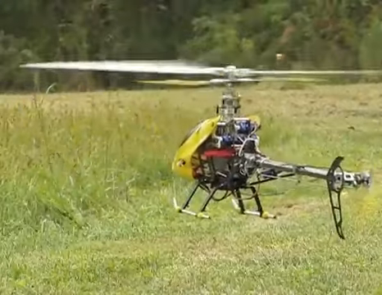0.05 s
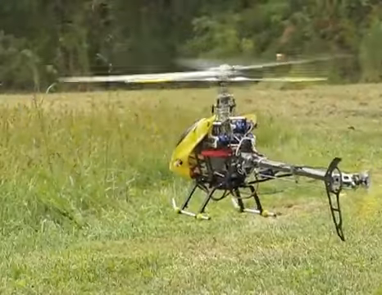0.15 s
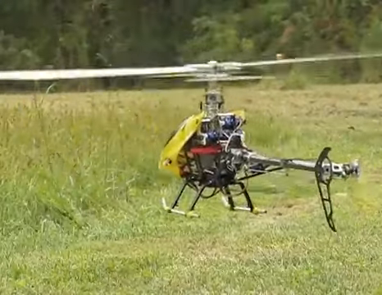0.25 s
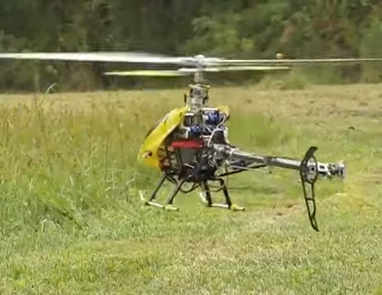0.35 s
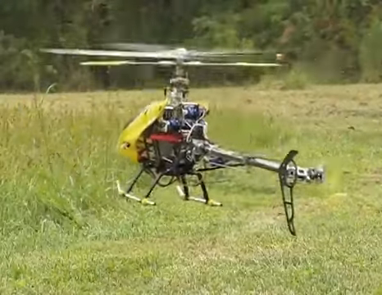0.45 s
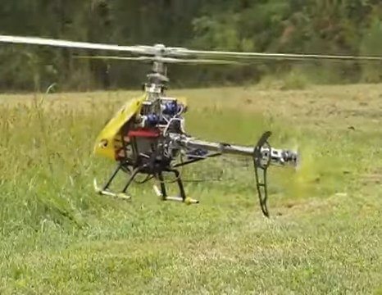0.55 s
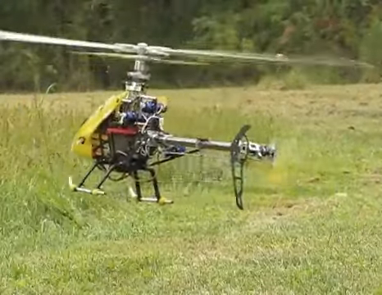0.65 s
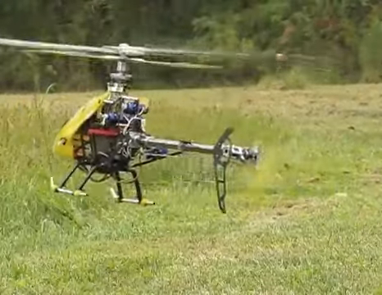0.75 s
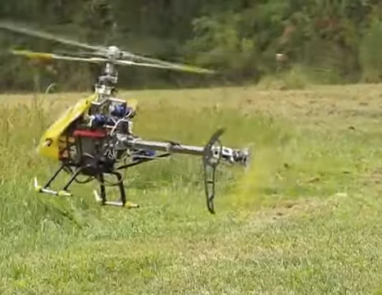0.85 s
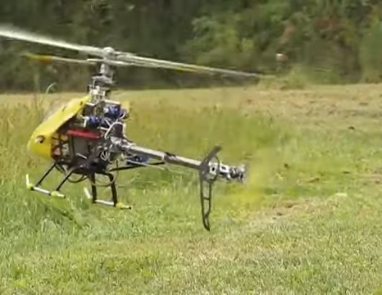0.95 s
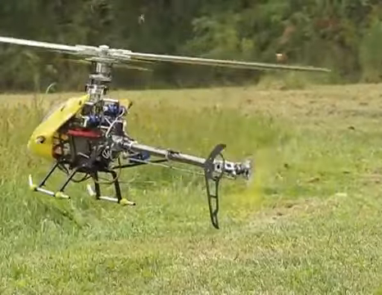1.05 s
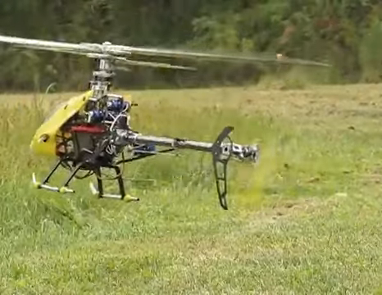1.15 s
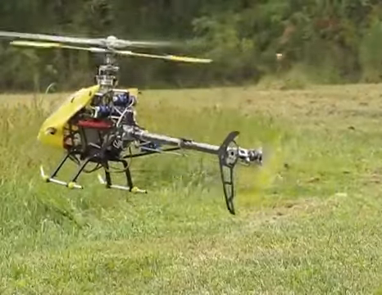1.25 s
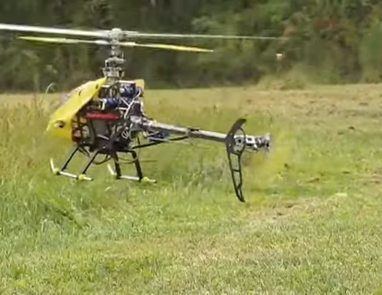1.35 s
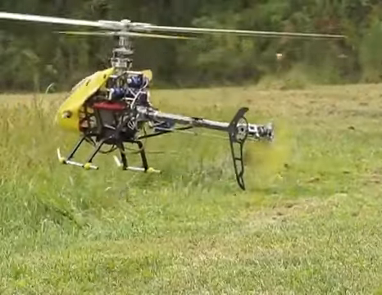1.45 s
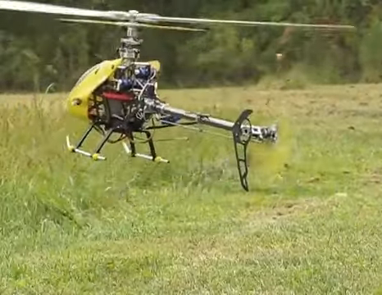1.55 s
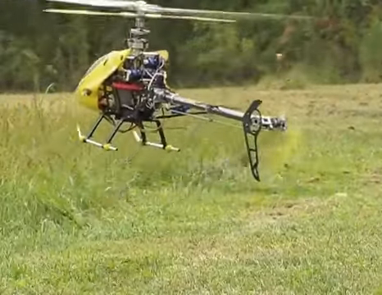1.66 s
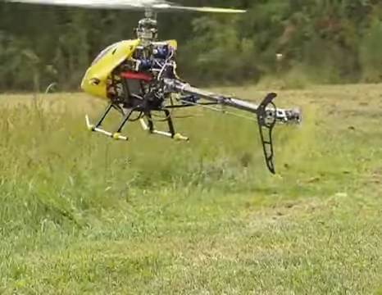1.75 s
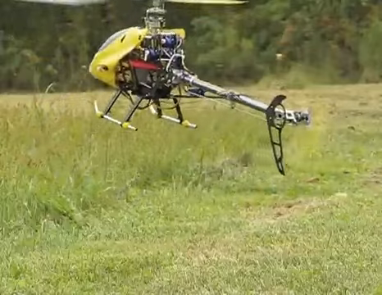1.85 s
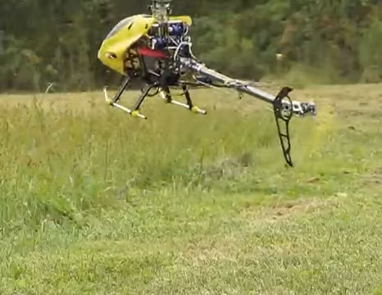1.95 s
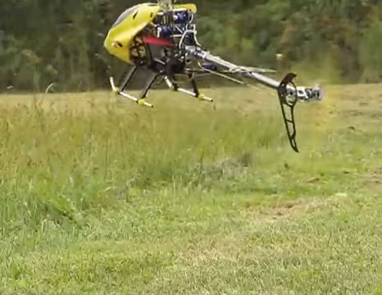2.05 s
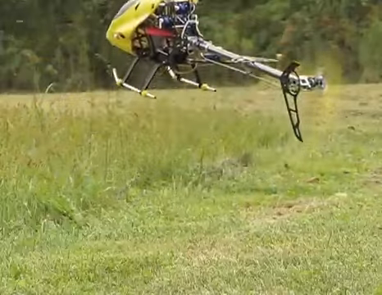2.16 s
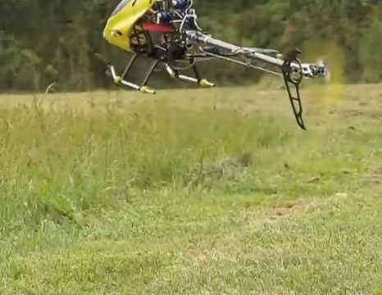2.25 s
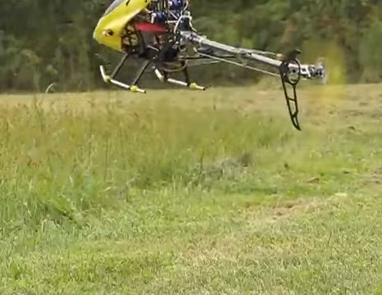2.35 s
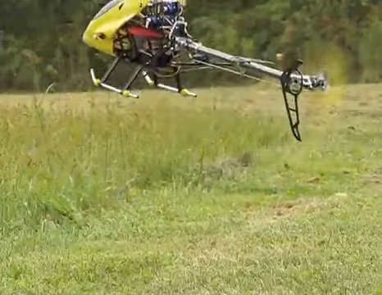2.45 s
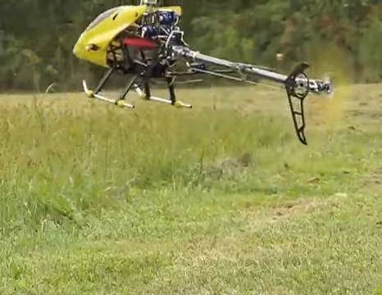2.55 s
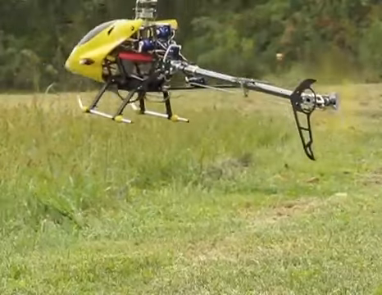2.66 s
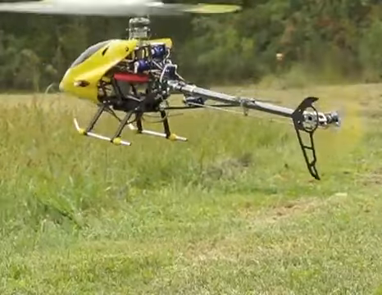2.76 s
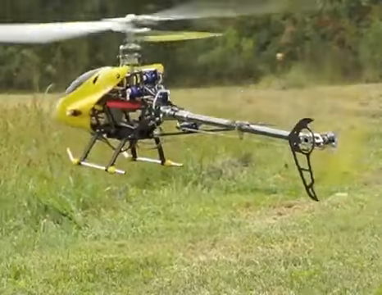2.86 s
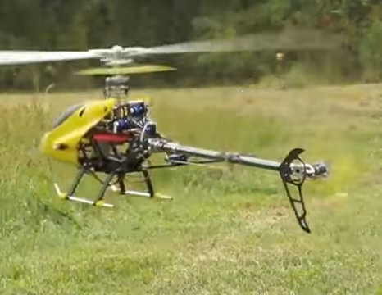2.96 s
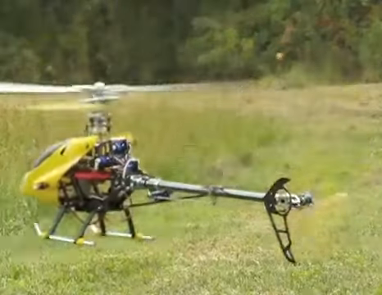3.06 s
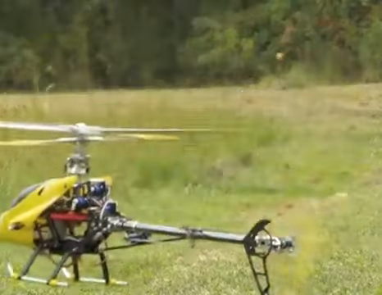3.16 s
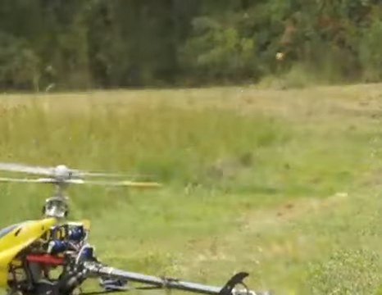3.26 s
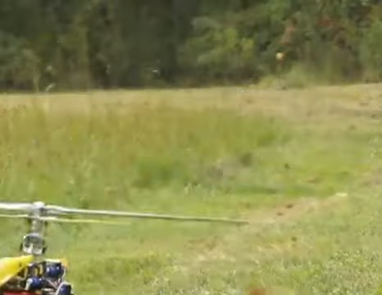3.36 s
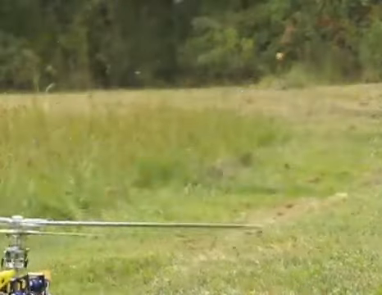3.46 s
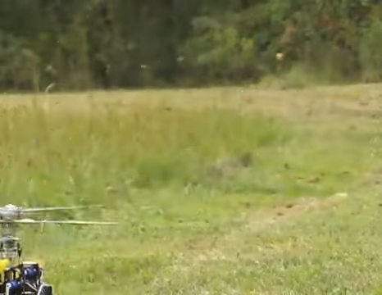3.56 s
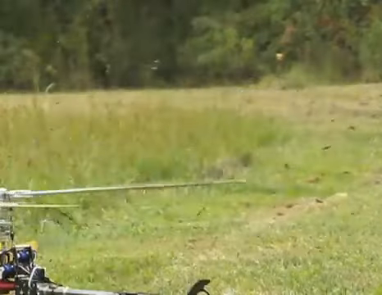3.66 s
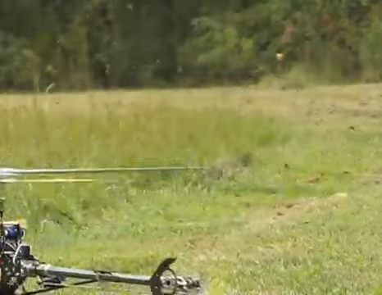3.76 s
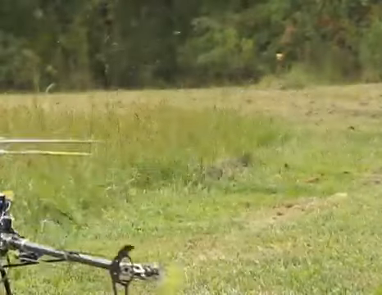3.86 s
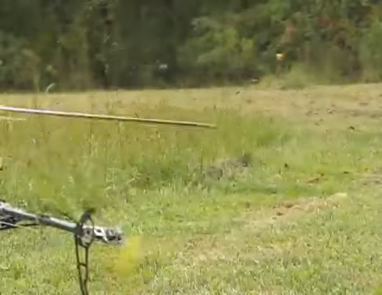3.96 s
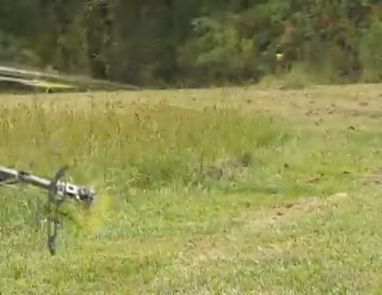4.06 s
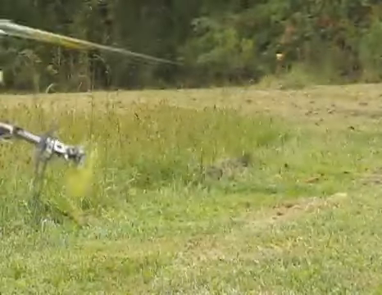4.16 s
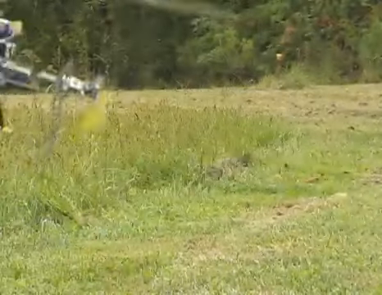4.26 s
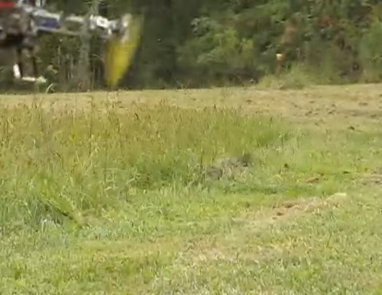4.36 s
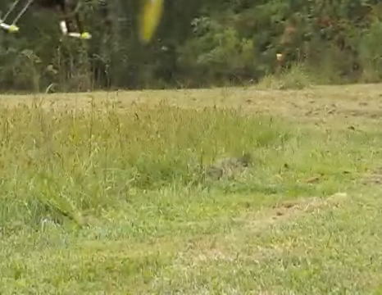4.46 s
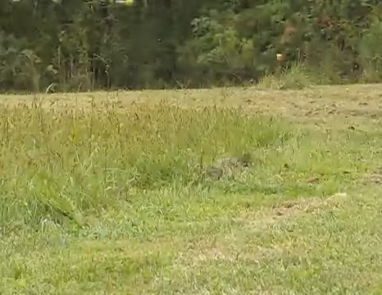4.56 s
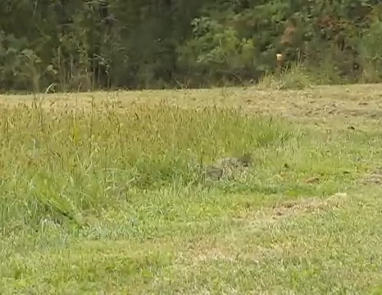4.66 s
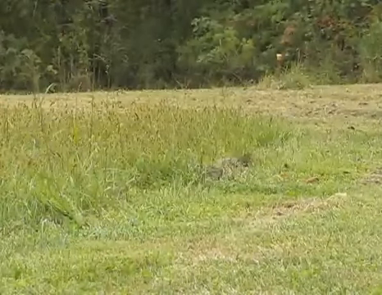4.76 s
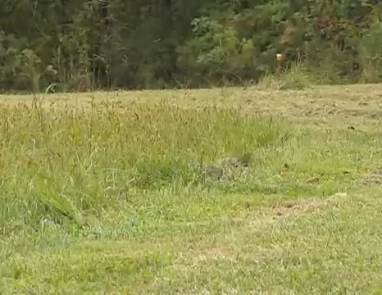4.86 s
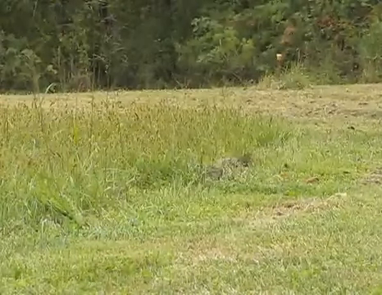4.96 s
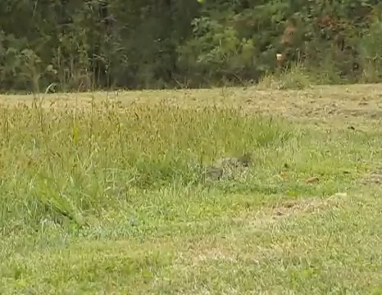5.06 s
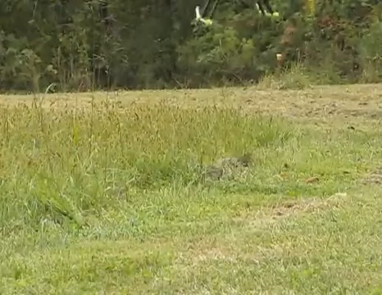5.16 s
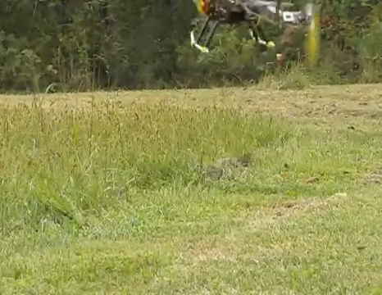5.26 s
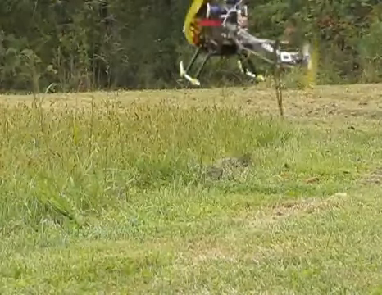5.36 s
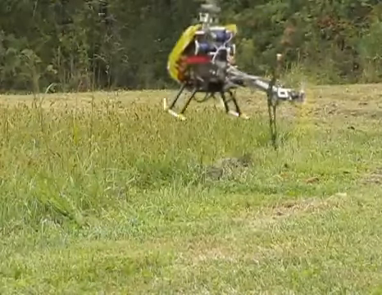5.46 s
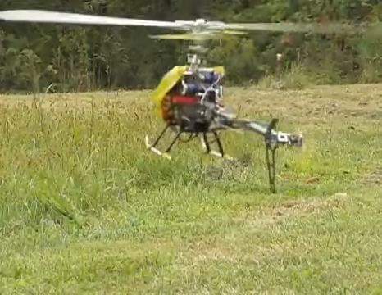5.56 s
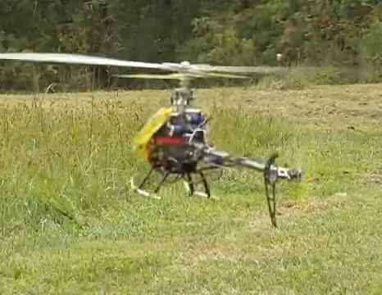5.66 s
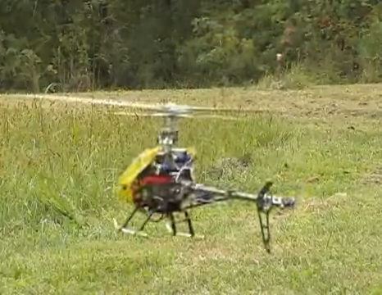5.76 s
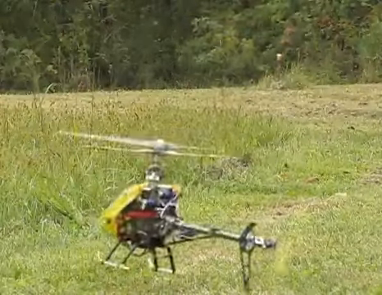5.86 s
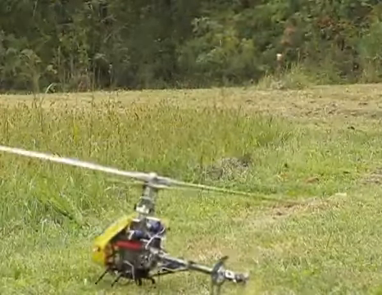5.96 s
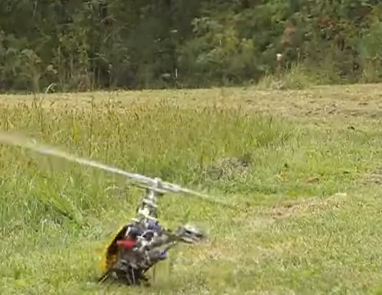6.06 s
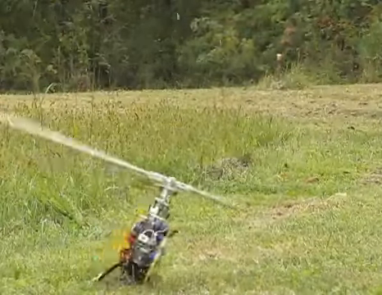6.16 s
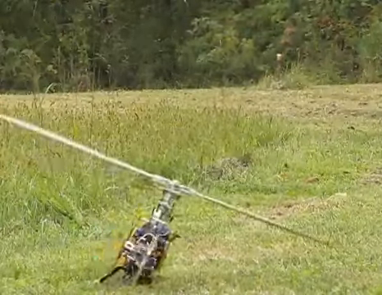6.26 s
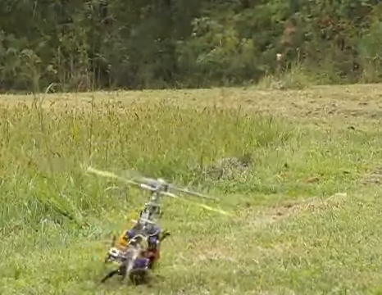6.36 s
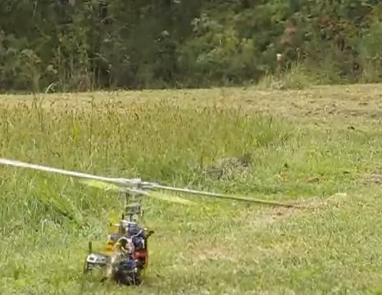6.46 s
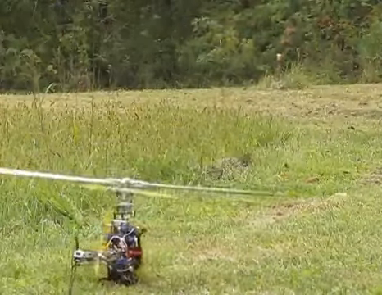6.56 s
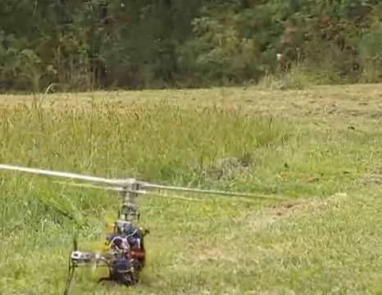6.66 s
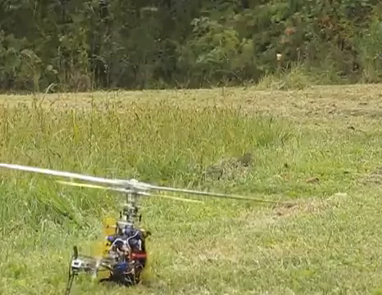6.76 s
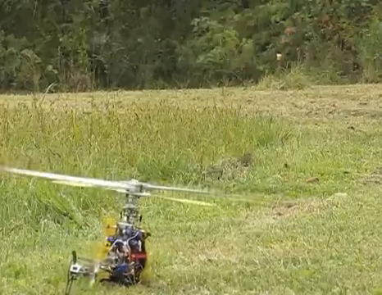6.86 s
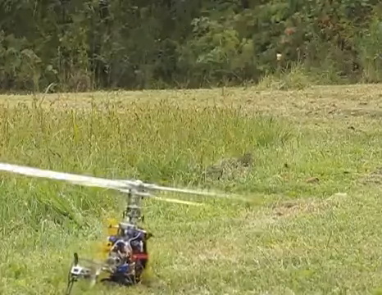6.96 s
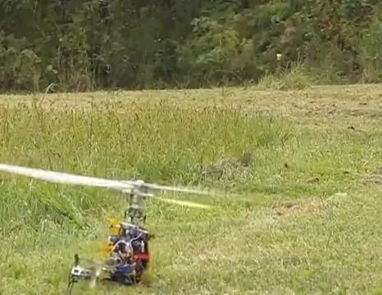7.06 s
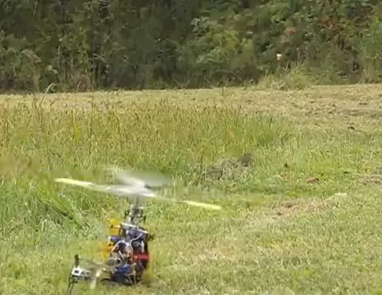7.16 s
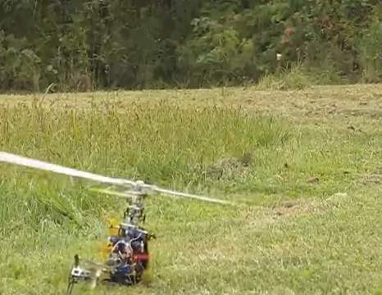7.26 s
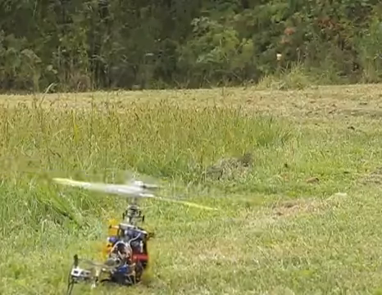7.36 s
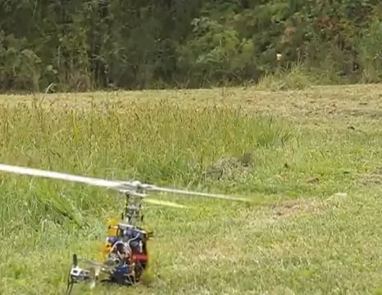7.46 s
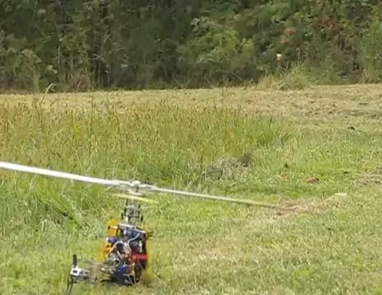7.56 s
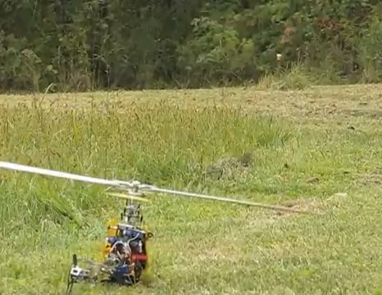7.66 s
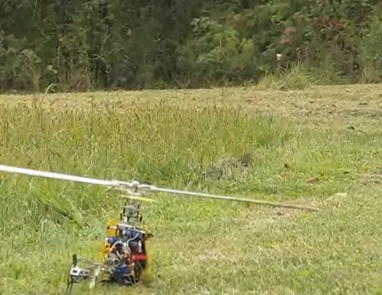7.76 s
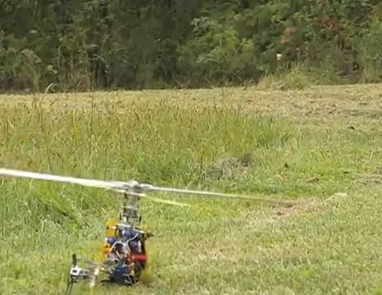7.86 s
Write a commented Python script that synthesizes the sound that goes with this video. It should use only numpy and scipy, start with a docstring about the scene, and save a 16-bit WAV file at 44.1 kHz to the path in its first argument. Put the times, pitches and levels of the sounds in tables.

```python
"""The whine and throb of an electric model helicopter hovering over a meadow, with one sharp early snap.
Its motor sings in harmonics, the off-centre main gear modulates the mesh tone once a rotor turn, and
the blades hum and swish. Interference with the echo off the grass hollows the sound as it climbs and
sinks. It lands and is switched off; the linkage ticks as the rotor coasts down, and crickets and
katydids come through."""
import sys
import numpy as np
from scipy import signal
from scipy.fft import rfft, irfft
from scipy.io import wavfile
from scipy.ndimage import uniform_filter1d

SR = 44100
rng = np.random.default_rng(int(sys.argv[2]) if len(sys.argv) > 2 else 0)


def put_to_file(sound):
    """Save the sound as 16-bit audio at rate SR, in the file named by the first command-line argument."""
    columns = np.atleast_2d(sound).T  # one column per channel
    safe = np.clip(columns, -1, 1)
    whole_steps = np.round(safe * 32767)
    wavfile.write(sys.argv[1], SR, whole_steps.astype(np.int16))


N = 348831
T = np.arange(N) / SR
HZ = np.fft.rfftfreq(N, 1 / SR)
PINION_TEETH, GEAR_TEETH, TAIL_RATIO = 10, 150, 3.625
POWER_OFF_S = 6.3


def amp(db):
    """Decibels to amplitude ratio."""
    return 10 ** (np.asarray(db) / 20)


def unit_rms(x):
    """Normalisation to an rms of one."""
    return x / np.sqrt(np.mean(x ** 2) + 1e-20)


def curves(rows):
    """Linear interpolation of each column over time."""
    times, *columns = np.transpose(rows)
    return [np.interp(T, times, column) for column in columns]


def spectrum(points):
    """Linear interpolation over log frequency."""
    hz, value = np.transpose(points)
    return np.interp(np.log(HZ + 1), np.log(hz + 1), value)


def colour(x, points):
    """Spectral shaping, normalised to an rms of one."""
    return unit_rms(irfft(rfft(x) * amp(spectrum(points)), N))


def drift(rate_hz):
    """Random modulation: low-pass noise of rms one."""
    return unit_rms(irfft(rfft(rng.standard_normal(N)) / (1 + (HZ / rate_hz) ** 4), N))


def stereo_noise(spread):
    """Partly coherent white noise: the channels are alike at spread 0, independent at 1."""
    mid, side = rng.standard_normal((2, N))
    return np.array([mid + spread * side, mid - spread * side])


def gritty(spread, grain_db=2.8):
    """Heavy-tailed noise: a few grains are louder than the rest."""
    return stereo_noise(spread) * amp(grain_db * np.minimum(rng.exponential(1, N), 4.2))


def add(mix, start_s, sound):
    """Superposition of a sound at a given time."""
    part = mix[round(start_s * SR):][:len(sound)]
    part += sound[:len(part)]


def tone(turns, flutter_db, scatter_rad):
    """Scintillation: turbulent air modulates the level and phase of a partial."""
    return unit_rms(amp(flutter_db * drift(22.0)) * np.cos(2 * np.pi * turns + scatter_rad * drift(44)))


def wandering(x, depth_db, bins=4):
    """Frequency-selective fading: patches of the spectrum slowly swell and sink."""
    frames = signal.stft(x, nperseg=1024, noverlap=768)[2]
    field = rng.standard_normal(frames.shape[1:])
    for size in (bins, 2 * bins):
        field = uniform_filter1d(uniform_filter1d(field, size, axis=0), size=8 * size, axis=1)
    return signal.istft(frames * amp(depth_db * unit_rms(field)), nperseg=1024, noverlap=768)[1][:, :N]


# Background spectra: (frequency [Hz], relative density [dB])
KATYDID_SPECTRUM = [(6000, -38.5), (6900, -9), (7300, 0.5), (7650, 3.5), (8100, -4.5), (9000, -9.5),
                    (10500, -38), (13000, -34)]
BREEZE_SPECTRUM = [(20, 15), (40, -3), (80, -7), (160, -33), (400, -30), (1000, -60)]
OPEN_AIR_SPECTRUM = [(20, -5), (70, 5), (170, -0.5), (300, -5.5), (600, -9), (1500, -16), (2100, -28),
                     (2400, -6.5), (2700, -22), (4000, -31), (9000, -14.5), (16000, -33.5)]


def meadow():
    """Incoherent sources add: fluttering katydids to the right, open air, a breeze on each microphone."""
    flutter_db = 0.27 * drift(40) + 1.0 * np.sin(2 * np.pi * 17 * T + 1.4 * drift(1.4))
    chorus = wandering(colour(stereo_noise(1.0), KATYDID_SPECTRUM), depth_db=2.9, bins=2)
    katydids = amp(flutter_db) * chorus * amp([[-.8], [.8]])
    breeze = colour(rng.standard_normal((2, N)), BREEZE_SPECTRUM)
    open_air = colour(stereo_noise(0.22), OPEN_AIR_SPECTRUM)
    return amp(-36) * katydids + amp(-47) * open_air + amp(-58) * breeze


# Chirps of three wing strokes: (time [s], level [dB])
CRICKET_CHIRPS = [(6.933, -40), (7.223, -38), (7.507, -45), (7.817, -38.5)]


def crickets(hz=4650, stroke_s=0.0436, length_s=0.033, sag=0.036, rasp_rad=.6):
    """Stridulation: each wing stroke is a raspy, falling whistle, faintly reflected by the trees."""
    out, t = np.zeros(N), np.arange(0, length_s, 1 / SR)
    turns = hz * t * (1 + sag * (1 - t / length_s) / 2)
    whistle = np.exp(2j * np.pi * turns) * np.sin(np.pi * t / length_s)
    wobble = np.exp(1j * rasp_rad * drift(200))
    for chirp_s, db in CRICKET_CHIRPS:
        for start_s in chirp_s + stroke_s * np.arange(3):
            rasp = np.roll(wobble, -round(start_s * SR))[:len(t)]
            stroke = amp(db + rng.normal(0, 1)) * (whistle * rasp).real
            add(out, start_s, stroke)
            add(out, start_s + 0.025, amp(-16) * stroke)
    return out


# Flight path: (time [s], height above the grass [m])
FLIGHT_HEIGHT = [(0, 0.48), (.7, 0.52), (1.2, 0.53), (1.8, 0.54), (2.3, 0.74), (2.75, 0.6), (3.1, 0.47),
                 (3.5, 0.092), (3.8, 0.3), (4.1, 0.44), (4.5, 0.89), (4.9, 0.99), (5.4, .8), (5.72, 0.35),
                 (6.0, 0.13)]


def over_grass(x, share, dull_hz, mic_height_m=0.63, distance_m=8.76, grass_hz=395):
    """Comb filtering: the echo off soft ground cuts notches that slide down as the craft climbs."""
    extra_path_m = 2 * curves(FLIGHT_HEIGHT)[0] * mic_height_m / distance_m
    delay_s = extra_path_m / 343
    reflection = share * np.exp(-HZ / dull_hz) * (grass_hz - 1j * HZ) / (grass_hz + 1j * HZ)
    echo = irfft(rfft(x) * reflection, N)
    return x + np.array([np.interp(T - delay_s, T, channel) for channel in np.atleast_2d(echo)])


def linkage(db=-27, ticks_per_s=45, fade_db_per_s=12, spread_db=3):
    """A Poisson process of impacts: slack links tick finely while the rotor coasts."""
    since_s = T - POWER_OFF_S
    contacts = (rng.random(N) < ticks_per_s / SR) * (since_s > 0)
    strength = amp(spread_db * np.minimum(rng.exponential(1, N), 3))
    fade = amp(-fade_db_per_s * np.maximum(since_s, 0))
    band = signal.butter(2, [3500, 15000], "band", fs=SR, output="sos")
    return amp(db) * signal.sosfilt(band, contacts * strength * fade)


# Skid and linkage impacts: (time [s], level [dB], centre [Hz], width [Hz], relative chatter [dB])
IMPACTS = [(.1602, -1, 8800, 6000, -24), (6.0715, -9, 2400, 2400, -6), (6.3235, -3, 6500, 5000, -19),
           (6.5002, -7, 5600, 4000, -18), (6.574, -21, 5000, 4000, -10), (6.8672, -11, 5200, 3000, -7)]


def snaps():
    """Damped oscillation: each impact rings briefly while the loose part chatters against its seat."""
    out, t = np.zeros(N), np.arange(600) / SR
    for start_s, db, hz, width_hz, chatter_db in IMPACTS:
        ring = np.exp(-np.pi * width_hz * t / 2) * np.cos(2 * np.pi * hz * t)
        contacts = np.exp(-t / .002) * rng.standard_normal(len(t))
        chatter = np.convolve(contacts, ring / np.linalg.norm(ring))[:len(t)]
        add(out, start_s, amp(db) * (ring + amp(chatter_db) * chatter))
    return signal.sosfilt(signal.butter(2, 1400, "high", fs=SR, output="sos"), out)


# Spells of rocking on the skids: (time [s], level [dB])
ROCKING = [(6.04, -41), (6.502, -53)]


def shudder(hz=3120, width_hz=160, attack_s=.08, hold_s=0.24, fade_db_per_s=90):
    """Resonance: small knocks against the ground keep one mode of the frame ringing."""
    mode = 1 / (1 + 2j * (HZ - hz) / width_hz) ** 2
    envelope = np.zeros(N)
    for start_s, db in ROCKING:
        rise = np.clip((T - start_s) / attack_s, 0, 1)
        envelope += rise * amp(db - fade_db_per_s * np.maximum(T - start_s - hold_s, 0))
    return envelope * unit_rms(irfft(rfft(gritty(0.16, grain_db=5.3)) * mode, N))


def squeal(shaft, db=-40, hz=10230, width_hz=380):
    """Swept excitation: the third harmonic of the coasting mesh falls through a resonance."""
    turns = 3 * PINION_TEETH * shaft
    detuning = (np.gradient(turns) * SR - hz) / width_hz
    return amp(db) * np.exp(-detuning ** 2) * tone(turns, 1.7, 0.24)


# Motor under power: (time [s], speed [turns/s])
POWERED_SPEED = [(0, 476.7), (.4, 474.7), (.75, 468.3), (1.45, 465.8), (1.8, 466.7), (2.05, 464.6),
                 (2.3, 467.8), (2.85, 464.3), (3.27, 464.7), (3.45, 478), (3.6, 479.2), (3.77, 474.8),
                 (4.33, 475.8), (4.5, 469.6), (4.85, 459.8), (5.48, 453.2), (5.72, 465.8), (5.87, 468.3),
                 (6.02, 464), (6.1, 454.5), (6.3, 437)]


def speed(coast_s=1.47):
    """Exponential decay: drag slows the motor once the power is cut."""
    return curves(POWERED_SPEED)[0] * np.exp(-np.maximum(T - POWER_OFF_S, 0) / coast_s)


# Load on the drive: (time [s], effort relative to a steady hover [dB])
DRIVE_EFFORT = [(0, 1), (.14, 1.5), (.35, 0.7), (.75, 0.7), (1.2, 1.1), (2.2, -.6), (2.85, 2.1), (3.3, 1.5),
                (3.44, 2), (3.55, -0.8), (3.95, -1.5), (4.3, 0), (5.05, -1.1), (5.35, -0.7), (5.6, -0.9),
                (5.9, 1.5), (6.04, -3), (6.27, -2.5)]
# Heading of the gear side: (time [s], turn [0 side-on, 1 away, negative towards the microphone])
HEADING = [(0, -0.096), (.7, 0.21), (1.25, -0.019), (1.8, 0.19), (3.3, 0.031), (3.6, 0.12), (4.33, 0.14),
           (4.6, 0.55), (4.9, 0.84), (5.5, 0.8), (5.87, -0.22), (6.1, 0.81)]


def levels(parts, unload_s=0.031):
    """Gains add in decibels: each part follows effort, heading, the power switch and coasting speed."""
    power_off = np.clip((T - POWER_OFF_S) / unload_s + .5, 0, 1)
    slowing_db = 20 * np.log10(speed() / curves(POWERED_SPEED)[0])
    controls = np.array([np.ones(N), curves(DRIVE_EFFORT)[0], curves(HEADING)[0], power_off, slowing_db])
    return np.array(list(parts.values())) @ controls


# Blade-passing tones: (time [s], main rotor level [dB], tail rotor level [dB])
BLADE_TONES = [(0, -40, -46), (.3, -43, -47.5), (.65, -42, -47.5), (1.0, -43, -49.5), (1.75, -49, -43),
               (2.6, -44.5, -49.5), (3.35, -40.7, -43.5), (3.6, -51.5, -42), (4.2, -38.5, -44),
               (4.5, -46.5, -48.5), (5.2, -50.5, -47.5), (5.6, -42, -43.5), (5.9, -42, -43.5),
               (6.3, -45, -56.5)]


def rotors(rotor, fade_db_per_s=26):
    """Blade-passing frequency: each two-bladed rotor pushes the air twice a turn."""
    main_db, tail_db = curves(BLADE_TONES) - fade_db_per_s * np.maximum(T - POWER_OFF_S, 0)
    main = tone(2 * rotor, 0.64, .08) + amp(-16) * tone(4 * rotor, 2.5, .3)
    return amp(main_db) * main + amp(tail_db) * tone(2 * TAIL_RATIO * rotor, 2.1, 0.29)


# Downwash, blade swish, gear rattle, rasp and fizz:
# (base level [dB], effort slope [dB/dB], turned away [dB], power off [dB], speed slope [dB/dB])
NOISE_LEVELS = {"wash": (-41, -0.1, -4, -2, 2.7), "swish": (-35, 0.6, -1, -6.5, 1.0),
                "rattle": (-32, .7, -3.5, -4.5, 1.36), "rasp": (-26.5, 1.0, 0.6, -9.5, 1),
                "fizz": (-28.5, 2.17, 0.5, -9.5, 1.2)}
# Their spectra: (frequency [Hz], relative density [dB])
WASH_SPECTRUM = [(20, -13), (45, -10), (110, -1.5), (190, -5), (300, -3), (480, 0), (650, 0), (900, -1.5),
                 (1400, -14)]
SWISH_SPECTRUM = [(500, -18), (800, -5), (1050, 0), (1500, -1), (2000, 3.5), (2400, 0.5), (3300, -30.5)]
RATTLE_SPECTRUM = [(1400, -49), (2100, -6.5), (2600, 2), (3200, 5.5), (3800, 4), (4500, 8), (5200, 2.5),
                   (6500, -61)]
RASP_SPECTRUM = [(3800, -52.5), (5200, 1.5), (6200, 0.5), (6800, 2), (7500, 2), (9000, 4.5), (10000, 2),
                 (11000, -30), (12500, -59)]
FIZZ_SPECTRUM = [(9000, -36), (10400, 0.5), (11200, -2), (12200, 2.5), (13200, 0), (14200, 4.5),
                 (15000, -4.5), (16000, -3)]
# Slow swell of the fizz: (time [s], gain [dB])
FIZZ_SWELL = [(0, -1.5), (2.4, .5), (2.8, -2.5), (3.25, -4.5), (3.5, -.5), (3.85, -1.8), (4.5, 0.5),
              (4.85, -.5), (5.5, -0.5), (6.0, 1.5)]


def air_and_tooth_noise(shaft, angle):
    """Modulated noise: the blades tear the air, and the teeth rub in pulses with each motor turn."""
    wash_db, swish_db, rattle_db, rasp_db, fizz_db = levels(NOISE_LEVELS)
    blades = 1 + 0.11 * np.cos(2 * angle)
    rub = amp(1.5 * np.cos(2 * np.pi * shaft + 1.1 * np.sin(angle)) + 1.5 * np.cos(4 * np.pi * shaft))
    out = amp(wash_db + 1.5) * colour(stereo_noise(0.055), WASH_SPECTRUM)
    out += amp(swish_db - 1.0) * colour(stereo_noise(0.0043) * blades, SWISH_SPECTRUM)
    rattle = gritty(0.17) * np.sqrt(rub) * (1 + 0.054 * np.cos(angle - .6))
    out += amp(rattle_db + 2.5) * colour(rattle, RATTLE_SPECTRUM)
    out += amp(rasp_db - 2.5 + 1.25 * drift(100)) * colour(gritty(0.27) * rub * blades, RASP_SPECTRUM)
    fizz_db = fizz_db + curves(FIZZ_SWELL)[0] + 0.91 * drift(85)
    out += amp(fizz_db) * colour(gritty(0.05) * rub * blades, FIZZ_SPECTRUM)
    out = over_grass(out, share=0.57, dull_hz=3740)
    return wandering(out, depth_db=1.15)  # sound beams sweep past as the craft sways


# Motor harmonics 1 to 5:
# (base level [dB], effort slope [dB/dB], turned away [dB], power off [dB], speed slope [dB/dB])
MOTOR_HARMONICS = {"first": (-42, 0, -.5, -3.5, 2.4), "second": (-47, .3, 0, -7, 3.2),
                   "third": (-41, .4, -1.5, -7, 4.0), "fourth": (-37.6, .5, -8, -9, 3.0),
                   "fifth": (-46.5, .5, 14, -15, 3.0)}


def motor(shaft):
    """Harmonic series: the spinning motor can sings at whole multiples of its speed."""
    first_db, second_db, *upper_db = levels(MOTOR_HARMONICS)
    upper = amp(second_db) * tone(2 * shaft, 0.37, 0.34)
    for order, db in enumerate(upper_db, start=3):
        upper += amp(db) * tone(order * shaft, flutter_db=1.5, scatter_rad=.25)
    first = amp(first_db) * tone(shaft, 1.0, 0.35)
    return over_grass(first, share=0.41, dull_hz=5000) + over_grass(upper, share=0.72, dull_hz=15000)


def throb(turns, angle, depth, sway, scatter, skew=0.24):
    """Amplitude and phase modulation: the off-centre gear presses into the pinion once a turn."""
    phase = 2 * np.pi * turns + sway * np.sin(angle) + scatter
    pressure = 1 + depth * (np.cos(angle) + skew * np.sin(2 * angle))
    return unit_rms(pressure * np.cos(phase))


# Lines of the loaded drive: (motor order [rounded in use], level over the rasp [dB], turned away [dB])
WHINE_LINES = [(6, -42, 1), (8, -28, 2), (11, -16.5, 6), (13, -18.5, -2), (14, -16.5, -1), (15, -19.5, 3),
               (17, -25, 5), (18, -12, -9), (19.1, -11, 5.5), (21, -15, -20), (24, -35, -6), (25, -23, -2),
               (26, -20, 2), (30, -26, 2)]


def whine(shaft, angle, slack, easing_db):
    """Shaft harmonics: no two pinion teeth are alike, so lines sound at motor orders while under load."""
    rasp_db = levels(NOISE_LEVELS)[3]
    load_db = np.clip((POWER_OFF_S - T) * 150, -30, 0) + 2.5 * easing_db
    turned = curves(HEADING)[0]
    out = np.zeros(N)
    for order, db, turned_db in WHINE_LINES:
        shake = 0.03 * order * slack + 0.5 * drift(4) + rng.uniform(0, 2 * np.pi)
        beam_db = 2 * np.sin(2 * np.pi * (rng.uniform(0.15, 1.0) * T + rng.random()))
        line = throb(round(order) * shaft, angle, depth=0.32, sway=0.26, scatter=shake)
        out += amp(db + turned_db * turned + rasp_db + load_db + beam_db) * line
    return out


# Mesh tone, motor orders 9 and 7, octave of the mesh:
# (base level [dB], effort slope [dB/dB], turned away [dB], power off [dB], speed slope [dB/dB])
GEAR_TONES = {"mesh": (-24.5, 0.23, -15.5, -20, 6), "ninth": (-33.5, 0.5, -4.5, -17, 2.5),
              "seventh": (-40, 1.4, -4, -16, 6), "octave": (-40.5, 3.5, 10.5, -23, 0)}


def gears(shaft, angle, play_rad=.3, scrape_rad_per_db=0.23):
    """Gear meshing: teeth meet at tooth count times shaft speed, and backlash scatters the phase."""
    mesh_db, ninth_db, seventh_db, octave_db = levels(GEAR_TONES)
    teeth = PINION_TEETH * shaft
    slack = drift(35)  # play between the teeth shakes the lines together
    easing_db = np.minimum(curves(DRIVE_EFFORT)[0], 0)
    scrape = scrape_rad_per_db * easing_db * np.maximum(curves(HEADING)[0], 0) * drift(200)
    mesh = amp(mesh_db + 1.27 * drift(44)) * throb(
        teeth, angle, depth=0.74, sway=0.45, scatter=scrape + 0.35 * slack + 0.081 * drift(250))
    ninth = amp(ninth_db + 1.9 * drift(34)) * throb(
        9 * shaft, angle, depth=0.37, sway=0.67, scatter=scrape + play_rad * drift(60))
    seventh = amp(seventh_db + 1.3 * drift(41)) * throb(
        7 * shaft, angle, depth=0.23, sway=0.32, scatter=play_rad * slack)
    octave = amp(octave_db + 2.0 * drift(36)) * throb(
        2 * teeth, angle, depth=0.47, sway=.5, scatter=.18 * slack)
    lines = mesh + ninth + octave + whine(shaft, angle, slack, easing_db)
    return over_grass(lines, share=0.13, dull_hz=4700) + over_grass(seventh, share=0.84, dull_hz=15000)


# Direction by level: (frequency [Hz], left minus right [dB])
LEVEL_DIFFERENCE = [(1900, 0), (2400, -1.5), (3300, -3), (4000, .3), (4700, 2.9), (5600, 2.7), (7500, 1.5),
                    (9100, 1.6), (11000, .3), (15000, 0)]
# Direction by phase: (frequency [Hz], lead of the left channel [rad])
PHASE_DIFFERENCE = [(0, 0), (1600, 0), (2930, -0.024), (4220, 0.77), (4570, 0.44), (5250, 0.074),
                    (6800, -1.1), (7410, 0.69), (7920, 0.14), (11300, -0.04), (12100, -0.66),
                    (13300, -0.075), (16500, 0)]
# Sideways drift: (time [s], share of the leftward offset [ratio])
LEFT_OFFSET = [(0, 0.81), (1.1, 0.85), (2.3, 0.69), (3.6, 0.92), (4.2, 0.97), (4.7, 0.76), (5.3, 0.9),
               (5.8, 0.83), (6.3, 0.89)]


def localise(craft):
    """Localisation: level and phase differences between the channels place the craft."""
    towards = amp(spectrum(LEVEL_DIFFERENCE) / 2) * np.exp(.5j * spectrum(PHASE_DIFFERENCE))
    left, right = irfft(rfft(craft) * np.array([towards, 1 / towards]), N)
    mid = (left + right) / 2
    side = curves(LEFT_OFFSET)[0] * (left - right) / 2
    return np.array([mid + side, mid - side])


def scene():
    """Superposition: the helicopter, phase-locked as one geared train, in its meadow."""
    shaft = np.cumsum(speed()) / SR  # motor turns
    rotor = shaft * PINION_TEETH / GEAR_TEETH
    angle = 2 * np.pi * (rotor - 0.62)  # zero where the main gear's heavy side meets the pinion
    craft = rotors(rotor) + motor(shaft) + gears(shaft, angle) + squeal(shaft) + shudder()
    craft += air_and_tooth_noise(shaft, angle)
    return localise(craft) + snaps() + linkage() + crickets() + meadow()


def record(dry, threshold_db=-5.5, recover_db_per_s=11):
    """Limiting: the gain ducks just after a loud peak and recovers slowly; a low-pass follows."""
    over_db = np.maximum(20 * np.log10(abs(dry).max(0) + 1e-9) - threshold_db, 0)
    duck_db = np.maximum.accumulate(over_db + recover_db_per_s * T) - recover_db_per_s * T
    duck_db = signal.lfilter([.01], [1, -.99], duck_db)  # attack of about 2 ms
    low_pass = signal.firwin(511, 15900, window=("kaiser", 9), fs=SR)
    return signal.oaconvolve(dry * amp(-duck_db), low_pass[None], "same")


dry = scene()
out = record(dry)
put_to_file(out)
```